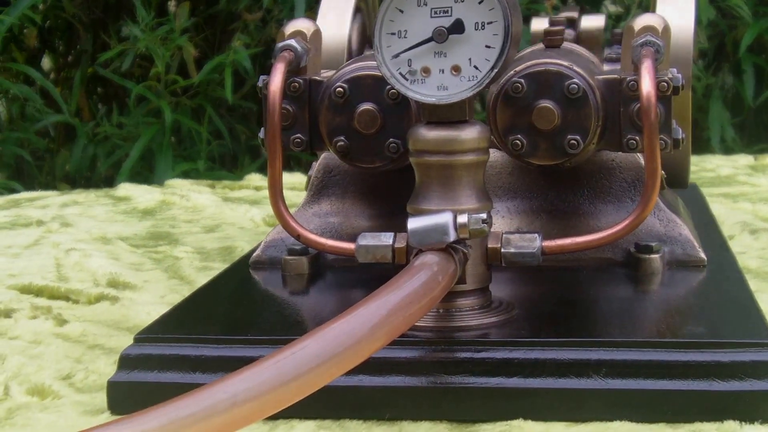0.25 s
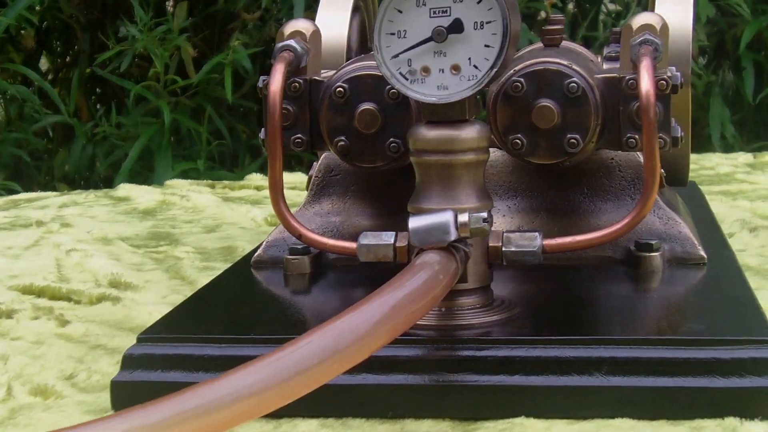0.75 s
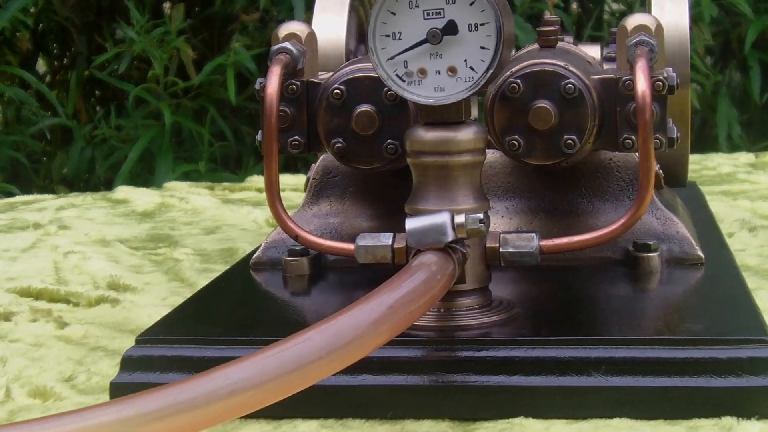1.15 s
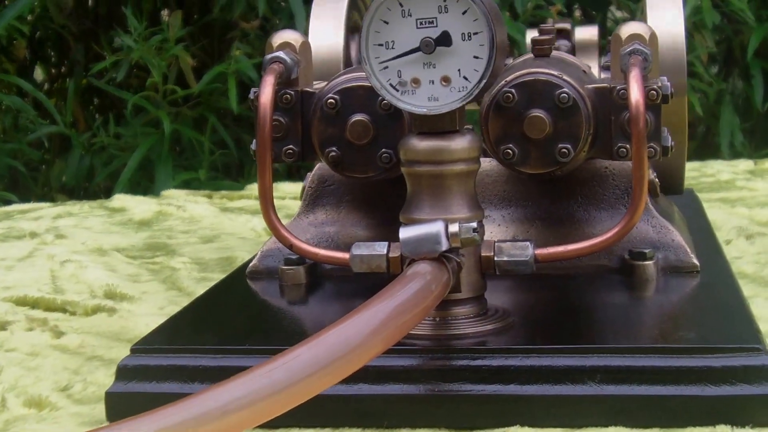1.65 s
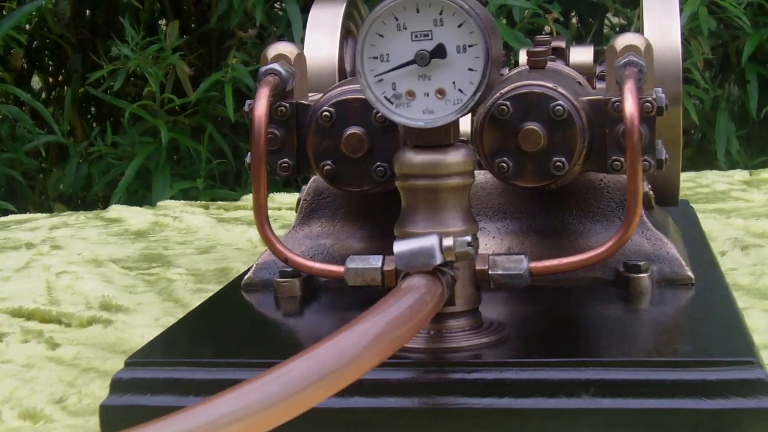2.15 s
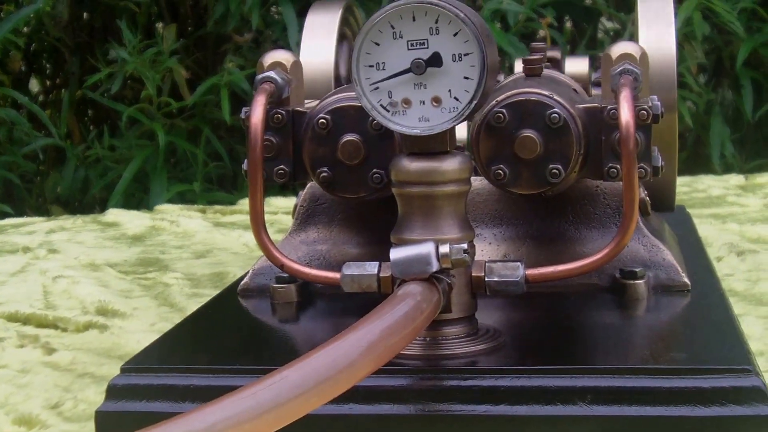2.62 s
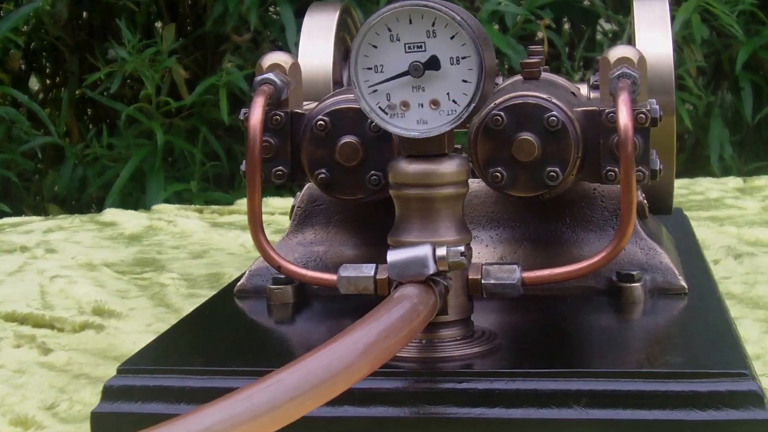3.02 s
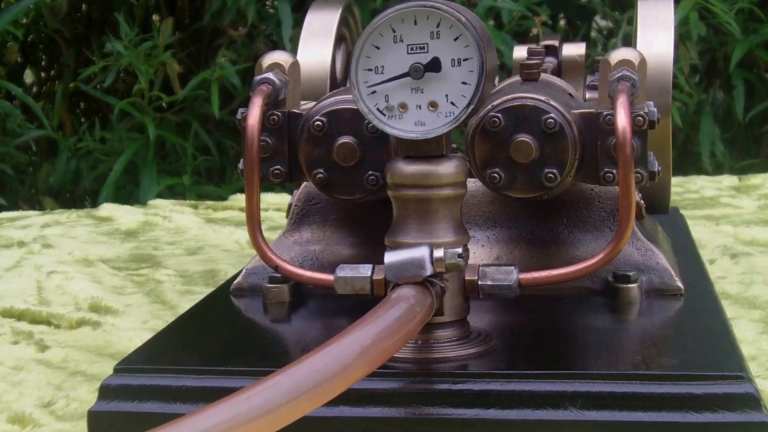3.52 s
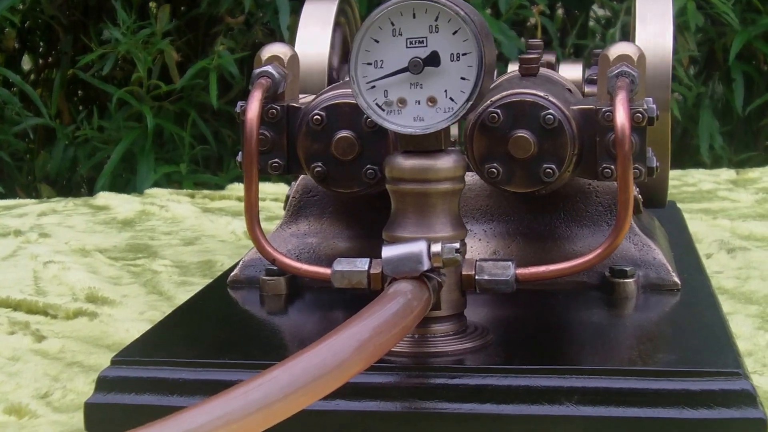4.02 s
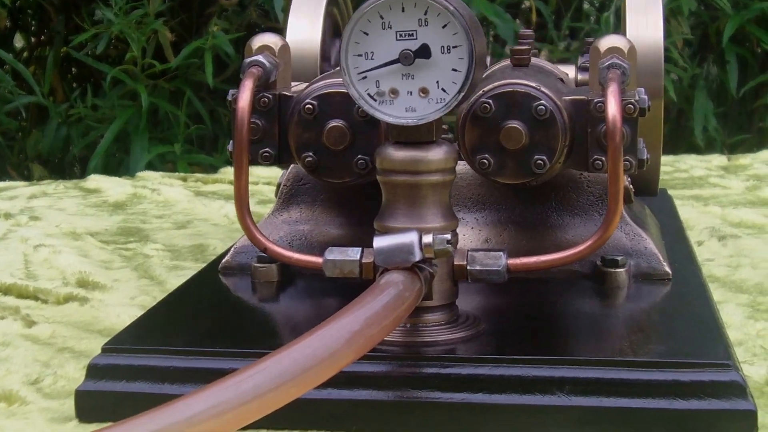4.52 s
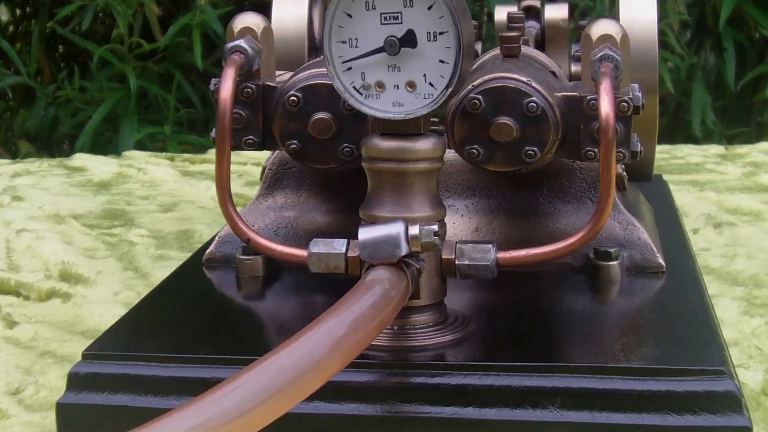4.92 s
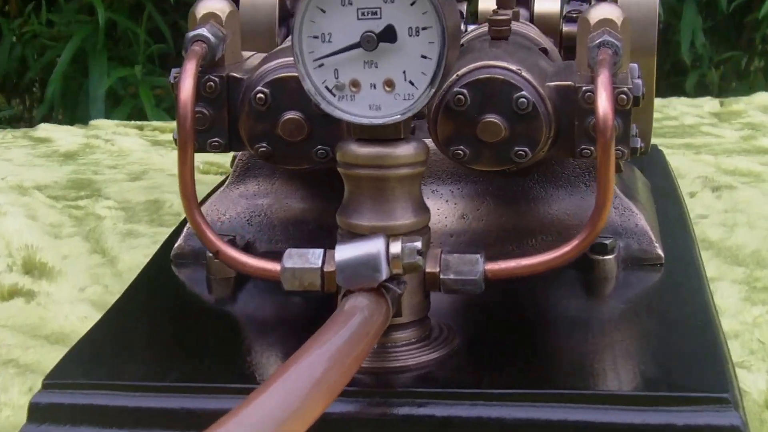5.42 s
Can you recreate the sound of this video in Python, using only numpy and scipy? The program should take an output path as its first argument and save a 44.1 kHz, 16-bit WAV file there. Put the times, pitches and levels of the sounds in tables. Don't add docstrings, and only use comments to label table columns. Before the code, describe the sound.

Close metallic knocking, three beats per turn, over leaking air and whirring parts; after about one and a half seconds it quickens and hardens.

```python
import sys
import numpy as np
from scipy import signal
from scipy.fft import rfft, irfft, next_fast_len
from scipy.io import wavfile
from scipy.ndimage import uniform_filter1d, map_coordinates

SR = 44100
rng = np.random.default_rng(int(sys.argv[2]) if len(sys.argv) > 2 else 0)


def materialize(psi):
    bounded = np.clip(np.atleast_2d(psi).T, -1, 1)
    quanta = np.round(bounded * 32767).astype(np.int16)
    wavfile.write(sys.argv[1], SR, quanta)


def voltage_ratio(decibels):
    exponent = np.asarray(decibels, float) / 20
    return 10 ** exponent


N = 250045
T = np.arange(N) / SR

VALVE_S, HARD_S = 1.4618, 1.58
LEAD_S = .005
ANGLES_SLOW, ANGLES_FAST = [.008, .249, .522], [-.0138, .229, .509]


def unit(x):
    return x / np.sqrt(np.mean(x ** 2) + 1e-20)


def wobble(rate):
    knots = rng.standard_normal(int(N * rate / SR) + 4)
    return map_coordinates(knots, [T * rate])


def filtered(x, response):
    m = next_fast_len(N + 8192)
    return irfft(rfft(x, m) * response(np.fft.rfftfreq(m, 1 / SR)), m)[..., :N]


def rush(spectrum, patchy_db):
    z = signal.stft(rng.standard_normal(N), nperseg=512)[2]
    patches = uniform_filter1d(rng.standard_normal(z.shape), size=6, axis=0)
    patches = uniform_filter1d(patches, size=8, axis=1)
    noise = signal.istft(z * voltage_ratio(patchy_db * unit(patches)), nperseg=512)[1][:N]
    f, level = np.transpose(spectrum)
    return unit(filtered(noise, lambda hz: voltage_ratio(np.interp(np.log(hz + 1), np.log(f), level))))


def crank():
    # [t/s, turns per s]
    load_speed = [
        (0, 4.6835),
        (1.45, 4.6605),
        (3.1, 4.7163),
        (4.2, 4.6777),
        (4.8, 4.6899),
        (5.67, 4.6668),
    ]
    added_speed, lag_s, start_turn = 1.7488, .1535, -.0315
    spin_up = 1 - np.exp(-np.maximum(T - VALVE_S, 0) / lag_s)
    speed = np.interp(T, *np.transpose(load_speed)) + added_speed * spin_up
    return start_turn + np.cumsum(speed) / SR


def rings(frame, closing):
    lead_tick = [-10, -13, -17]
    hz, t60, *level = np.transpose(frame)
    clock = np.arange(2048)[:, None] / SR
    out = []
    for db, (start, rise, slowing), tick_db in zip(level, closing, lead_tick):
        since = clock - LEAD_S - start
        t = np.maximum(since, 0)
        rise_s = rise * (2000 / hz) ** slowing
        swell = (1 - np.exp(-(t / rise_s) ** 2)) * voltage_ratio(-60 * t / t60)
        tick = voltage_ratio(tick_db) * np.exp(-((since + .0008) / .0009) ** 2)
        tones = np.sin(2 * np.pi * (hz * clock + rng.random(len(hz))))
        out.append(voltage_ratio(db) * (swell + tick) * tones)
    return out


def knocks():
    # [f/Hz, t60/s, crosshead level/dB, crank pin level/dB, main bearing level/dB]
    frame_slow = [(786, 0.019, -52, -24, -36), (867, 0.024, -24, -44, -17.5), (1060, 0.018, -16, -45, -22),
                  (1242, 0.013, -22, -44, -12), (1654, 0.016, -20, -25, -24.5),
                  (2002, 0.016, -35, -16.5, -28), (2268, 0.072, -30.5, -35, -32),
                  (2480, 0.016, -24.5, -20, -16), (2930, 0.022, -36, -33, -21.5),
                  (3280, 0.022, -30, -37, -25), (3774, 0.027, -30, -31, -29.5),
                  (4700, 0.018, -43, -40, -50), (4760, 0.017, -54, -34, -28), (5300, 0.054, -47, -41, -48)]
    frame_fast = [(789.6, 0.034, -38, -18, -25.5), (909, 0.026, -26, -21, -10),
                  (1036, 0.013, -11.5, -14, -24.5), (1239, 0.012, -30, -15.5, -11),
                  (1593, 0.02, -25.5, -19.5, -26.5), (1816, 0.014, -33, -21, -16),
                  (2055, 0.066, -23, -27, -23), (2268, 0.025, -37, -14, -14.5),
                  (2527, 0.018, -44, -19.5, -10.5), (2928, 0.012, -39, -4.5, -11),
                  (3210, 0.016, -36, -17, -35), (3682, 0.02, -39, -18, -20), (3985, .022, -32, -25, -22),
                  (4630, 0.019, -39, -20, -39), (4850, 0.012, -42, -28.5, -42),
                  (5450, 0.018, -50, -24, -39)]
    # [start of the ring/s, rise at 2 kHz/s, slowing toward the bass]
    closing_slow = [(-0.0012, 0.001, 1.5), (0.001, 0.001, 0.8), (0.0009, 0.001, 0.8)]
    closing_fast = [(-.0012, .001, 1.5), (0, .0021, 0), (-.0004, .0027, .1)]
    slow_db, fast_db = [2, .5, 3], [1.1, 0, 0]
    rebound_s, rebound_db = .0085, [-16.5, -13.5, -11.5]

    out, turn = np.zeros(N + SR), crank()
    whole = np.arange(int(turn[-1]) + 1)[:, None]
    slow_s = np.interp(whole + ANGLES_SLOW, turn, T).ravel()
    fast_s = np.interp(whole + ANGLES_FAST, turn, T).ravel()
    slow, fast = rings(frame_slow, closing_slow), rings(frame_fast, closing_fast)
    scatter = rng.standard_normal((len(slow_s), len(frame_fast) + 1))
    for k, hard in enumerate(slow_s > HARD_S):
        bearing = k % 3
        s = (fast_s if hard else slow_s)[k]
        modes = (fast if hard else slow)[bearing]
        count = modes.shape[1]
        cushion_db = -1 * np.exp(-(s - VALVE_S) / .4) * (s > VALVE_S)
        db = (fast_db if hard else slow_db)[bearing] + cushion_db + 0.44 * scatter[k, -1]
        ring = modes @ voltage_ratio(.8 * scatter[k, :count])
        out[round((s - LEAD_S) * SR):][:len(ring)] += voltage_ratio(db) * ring
        bounce = modes @ voltage_ratio(3 * scatter[k - 1, :count])
        out[round((s - LEAD_S + rebound_s) * SR):][:len(ring)] += voltage_ratio(db + rebound_db[bearing]) * bounce
    return filtered(out[:N], lambda hz: 1 / (1 + (450 / (hz + 1)) ** 6))


def link():
    angle, ring_hz, t60, level_db = .725, 3880, 0.023, -28.5
    turn, blows, t = crank(), np.zeros(N), np.arange(1024) / SR
    s = np.interp(np.arange(int(turn[-1])) + angle, turn, T)
    blows[(s * SR).astype(int)] = voltage_ratio(level_db + 2 * rng.standard_normal(len(s))) * (s > HARD_S)
    ring = voltage_ratio(-60 * t / t60) * np.sin(2 * np.pi * ring_hz * t)
    return signal.fftconvolve(blows, ring)[:N]


def air():
    # [t/s, level/dB]
    supply = [
        (0, 0),
        (.77, -0.56),
        (1.43, 0),
        (1.47, 3.5),
        (1.8, 2.9),
        (1.9, 1.95),
        (2.8, 1.9),
        (3.5, 2.5),
        (5.3, 2.5),
        (5.67, 3.5),
    ]
    # [share of turn, width/turns, jet level/dB, hiss level/dB, sizzle level/dB]
    puffs = [(.24, 0.027, 5, -7.5, 4), (.46, 0.061, -1.5, -5.5, -1), (.8, 0.029, -3, -7, -8),
             (.97, 0.052, -3.5, -7, 1.5)]
    # [f/Hz, level/dB per Hz]
    hiss_spectrum = [(3240, -56), (5500, -5.5), (7230, 0), (7780, 1.5), (8330, 1.5), (9680, 2), (14000, -5),
                     (14700, -4), (15300, -19)]
    # [f/Hz, level/dB per Hz]
    jet_spectrum = [(1760, -30), (3000, -3), (4210, -3), (4640, 1.5), (5050, 0), (6500, -1.5), (8450, -40),
                    (14300, -120)]
    # [f/Hz, level/dB per Hz]
    sizzle_spectrum = [(8000, -40), (11000, -29), (13000, 15), (15300, -3)]
    # [f/Hz, level/dB per Hz]
    whirr_spectrum = [(18, -90), (30, -56), (178, -29), (227, -24), (360, -15), (506, -12), (740, -7),
                      (922, 0.5), (1430, -5), (1900, -5), (2050, -3.5), (2720, -5.5), (2950, -4),
                      (3600, -7), (4680, -15.5), (7920, -120)]

    supply_db = np.interp(T, *np.transpose(supply))
    hiss_db = -27 + 0.76 * supply_db
    jet_db = -36.5 + 2.29 * supply_db
    whirr_db = -30.5 + 0.82 * supply_db
    turn = crank() - ANGLES_FAST[0] * (T > HARD_S)
    jet, hiss, sizzle = 1, 1, 0
    for share, width, puff_jet_db, puff_hiss_db, puff_sizzle_db in puffs:
        from_opening = (turn - share + .5) % 1 - .5
        gate = np.exp(-.5 * (from_opening / width) ** 2) * voltage_ratio(1.1 * wobble(7))
        jet = jet + 0.46 * voltage_ratio(puff_jet_db) * gate
        hiss = hiss + 0.4 * voltage_ratio(puff_hiss_db) * gate
        sizzle = sizzle + voltage_ratio(puff_sizzle_db) * gate
    flutter = .3 * wobble(7)
    out = voltage_ratio(hiss_db + 0.26 + flutter) * unit(hiss * rush(hiss_spectrum, patchy_db=0.62))
    out += voltage_ratio(hiss_db - 13.5) * sizzle * rush(sizzle_spectrum, patchy_db=-1.0)
    out += voltage_ratio(jet_db - 1.2 + flutter) * unit(jet * rush(jet_spectrum, patchy_db=0.67))
    rattle = jet ** .25 * voltage_ratio(.5 * wobble(25) + .8 * wobble(90))
    return out + voltage_ratio(whirr_db - 1.03) * unit(rattle * rush(whirr_spectrum, patchy_db=-0.96))


def gland():
    center_hz, width_hz, level_db = 3170, 500, -43
    noise = voltage_ratio(0.88 * wobble(30)) * rng.standard_normal(N)
    return voltage_ratio(level_db) * unit(filtered(noise, lambda hz: 1 / (1 + (2 * (hz - center_hz) / width_hz) ** 2)))


def compressor():
    # [multiple of the pump rate, peak level/dB]
    pump = [(2, -73), (4, -67), (5, -54), (6, -57), (7, -55), (8, -52), (9, -59), (10, -57), (11, -67),
            (12, -54), (13, -48), (15, -43), (16, -42), (17, -57), (18, -53), (19, -52), (20, -50)]
    pump_hz, spread = 46.482, .35
    angle = 2 * np.pi * pump_hz * T + 0.023 * wobble(2.54)
    return sum(voltage_ratio(db + .6 * wobble(3)) * np.sin(k * angle - spread * k * k) for k, db in pump)


def aircraft():
    # [t/s, f/Hz, level/dB]
    drone = [
        (0, 50.4, -97),
        (2, 50.8, -74),
        (3.1, 51.9, -57),
        (4.1, 51, -63),
        (5.301, 50, -77),
        (5.67, 48.7, -80),
    ]
    s, hz, db = np.transpose(drone)
    angle = 2 * np.pi * np.cumsum(np.interp(T, s, hz)) / SR
    tones = np.sin(3 * angle) + voltage_ratio(6) * np.sin(5 * angle)
    return voltage_ratio(np.interp(T, s, db) - 8.0 + 2.5 * wobble(4.0)) * tones


def scene():
    mono = knocks() + link() + air() + gland() + compressor() + aircraft()
    return np.array([mono, mono])


def low_pass(x):
    return signal.sosfilt(signal.butter(12, 15890, fs=SR, output="sos"), x)


def record(dry):
    # [t/s, low f/Hz, high f/Hz, level/dB]
    splits = [(.37, 5700, 6900, -41), (0.666, 6900, 9600, -34), (1.973, 13800, 15200, -39),
              (2.132, 5700, 7600, -32), (2.271, 8300, 9600, -33), (3.503, 8900, 10300, -31),
              (3.503, 13100, 14500, -37)]
    notch_hz, top_hz = 7850, 15320

    def response(hz):
        off = hz - notch_hz
        notch = np.abs(off) / np.sqrt(off ** 2 + 150 ** 2) + .05
        return notch * (hz < top_hz) / (1 + (55 / (hz + 1)) ** 4)

    x = filtered(dry, response)
    for s, lo_hz, hi_hz, db in splits:
        band = unit(filtered(rng.standard_normal(N), lambda hz: (hz > lo_hz) * (hz < hi_hz)))
        moment = np.exp(-((T - s) / 0.014) ** 4)
        x = x + voltage_ratio(db) * band * moment * [[1], [-1]]
    return low_pass(x)


dry = scene()
out = record(dry)
materialize(out)
```